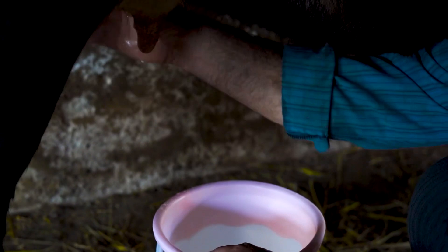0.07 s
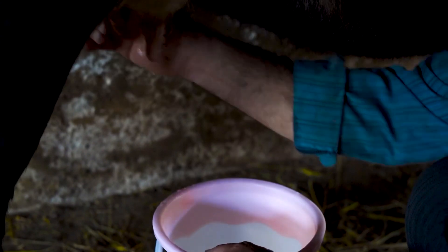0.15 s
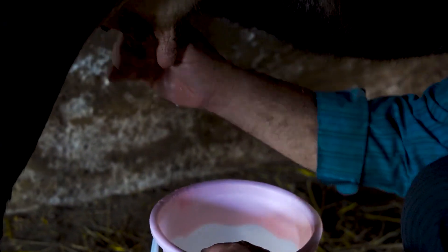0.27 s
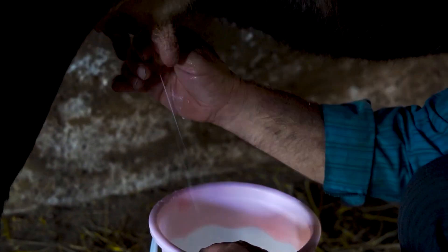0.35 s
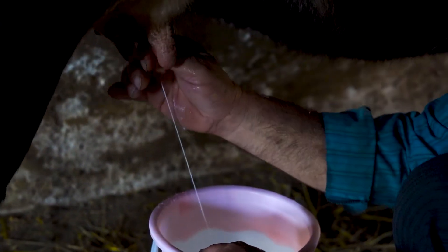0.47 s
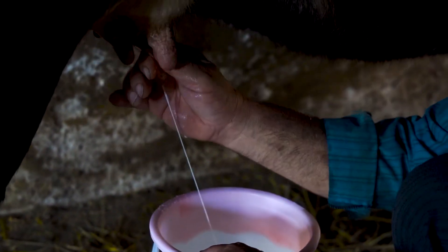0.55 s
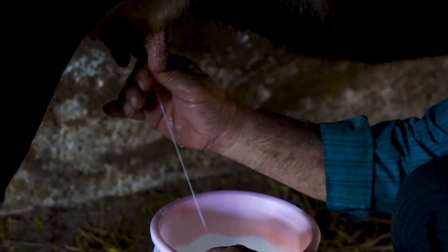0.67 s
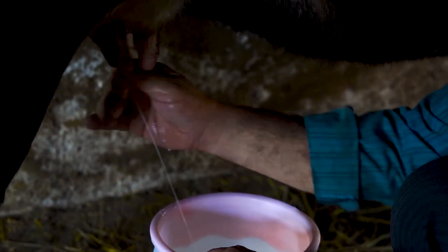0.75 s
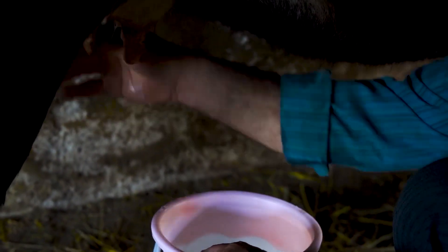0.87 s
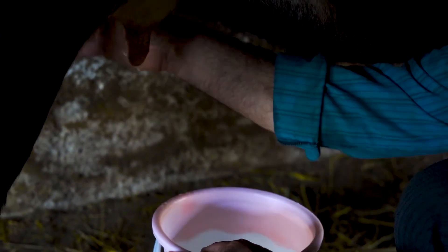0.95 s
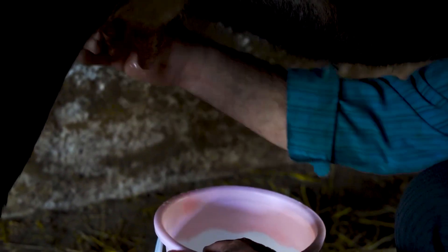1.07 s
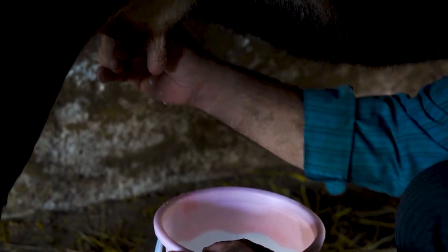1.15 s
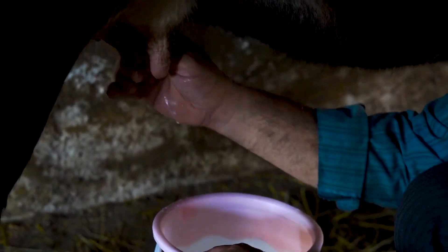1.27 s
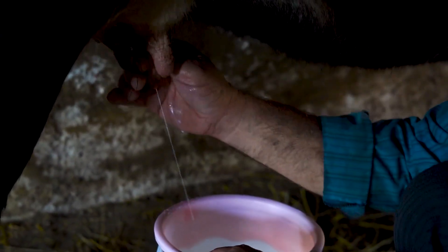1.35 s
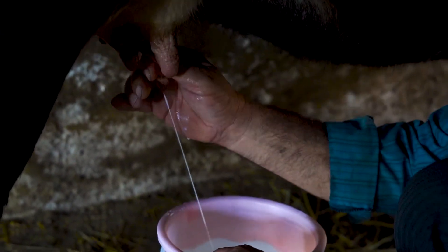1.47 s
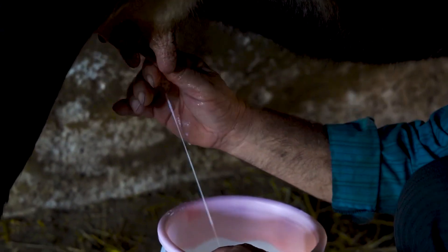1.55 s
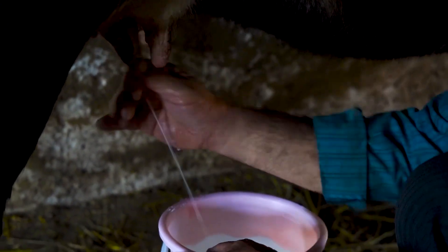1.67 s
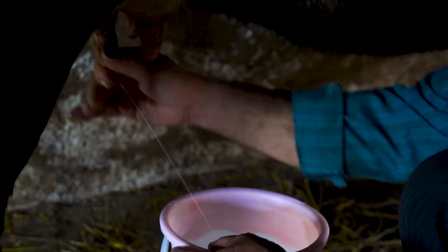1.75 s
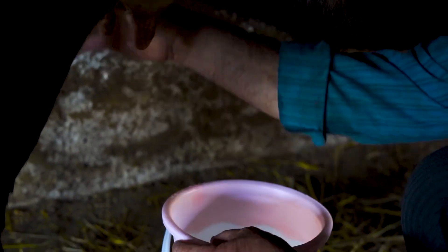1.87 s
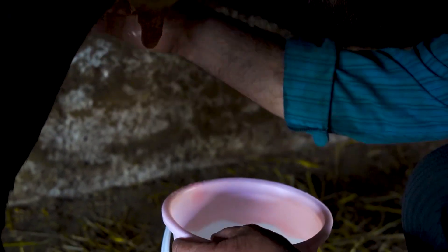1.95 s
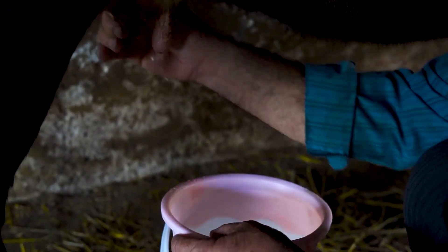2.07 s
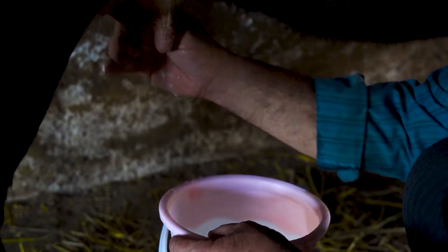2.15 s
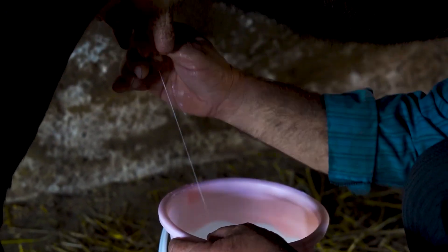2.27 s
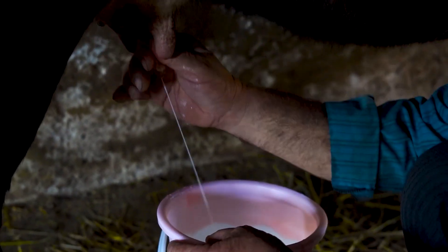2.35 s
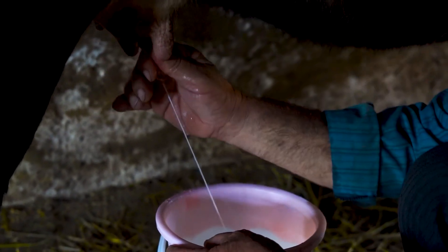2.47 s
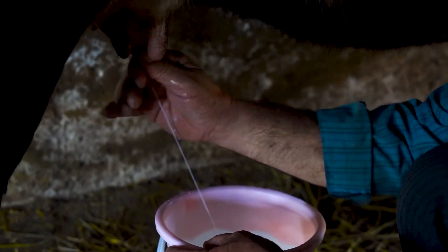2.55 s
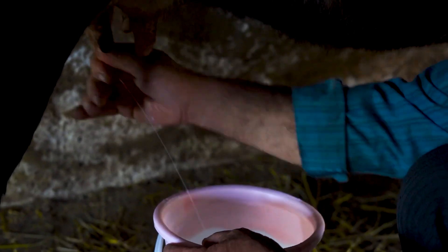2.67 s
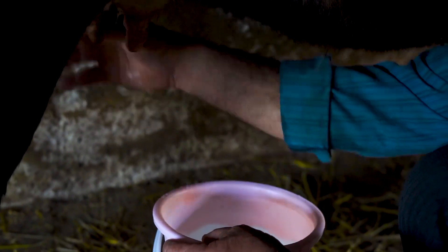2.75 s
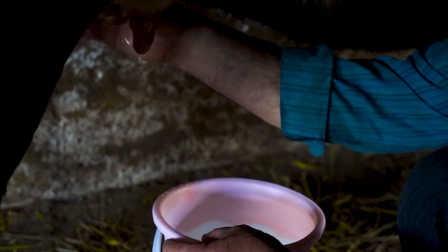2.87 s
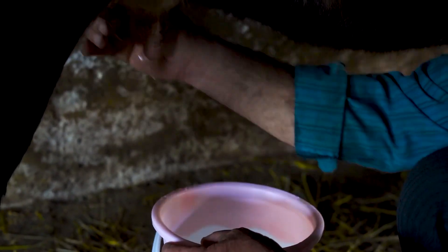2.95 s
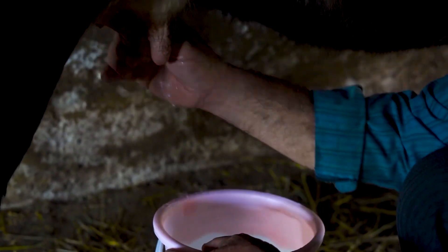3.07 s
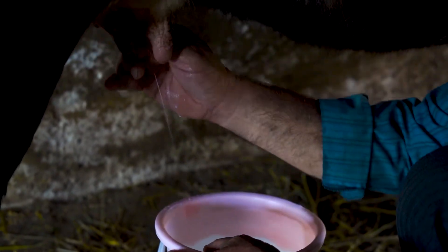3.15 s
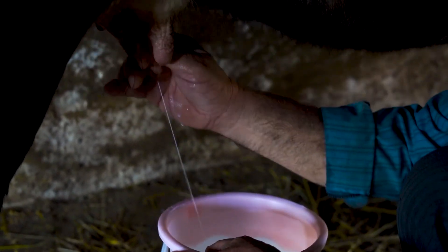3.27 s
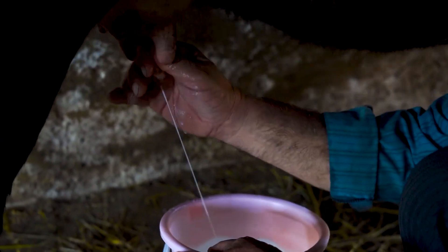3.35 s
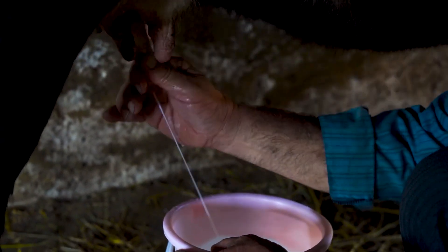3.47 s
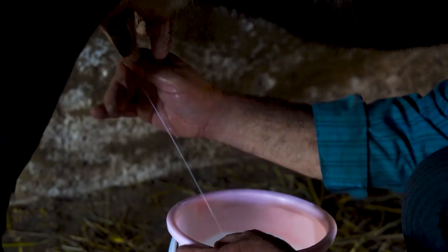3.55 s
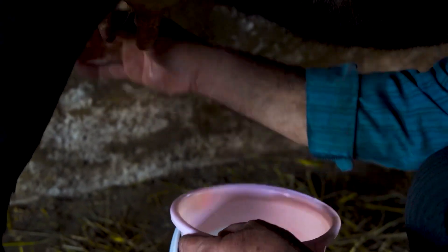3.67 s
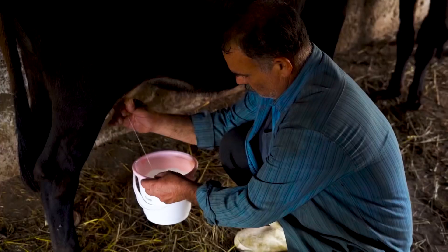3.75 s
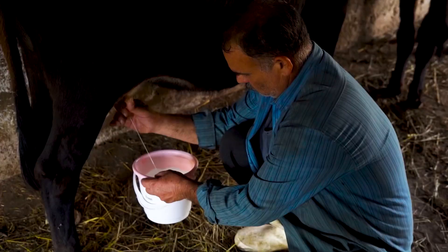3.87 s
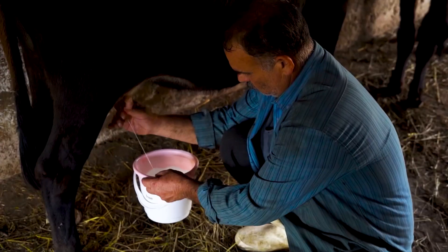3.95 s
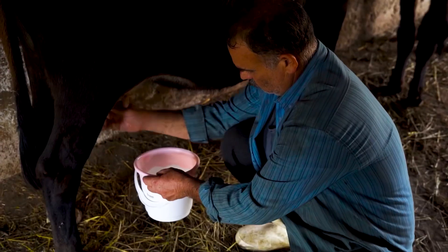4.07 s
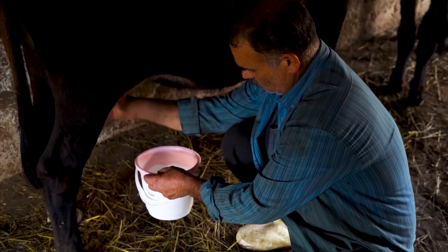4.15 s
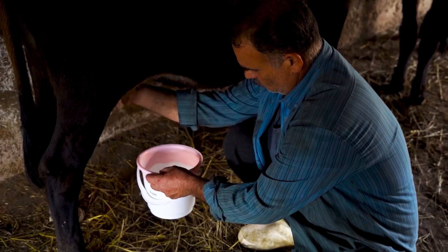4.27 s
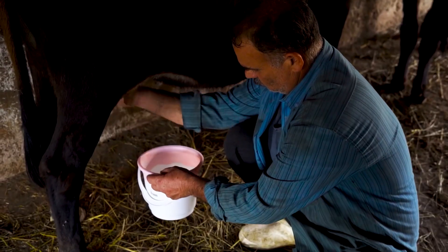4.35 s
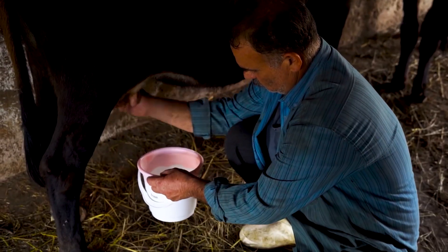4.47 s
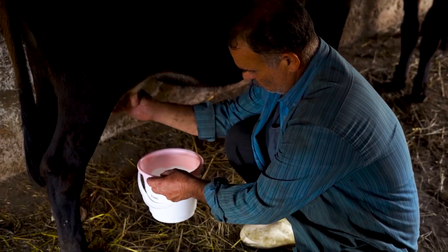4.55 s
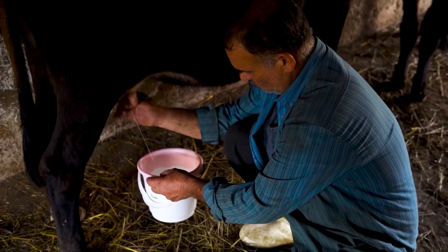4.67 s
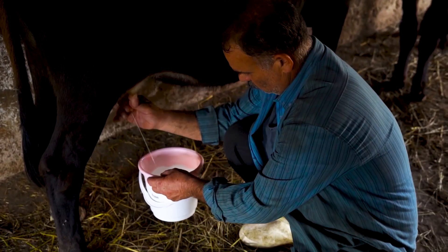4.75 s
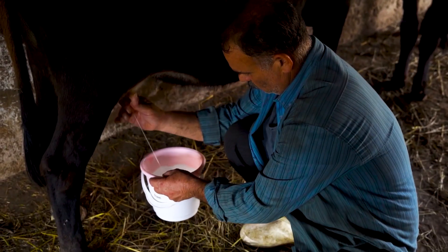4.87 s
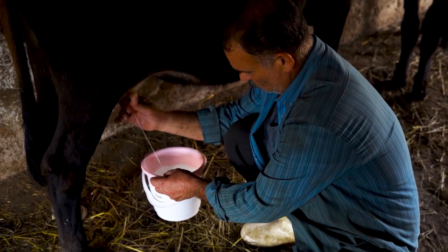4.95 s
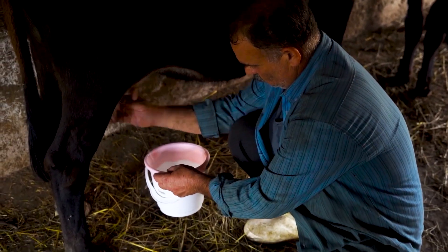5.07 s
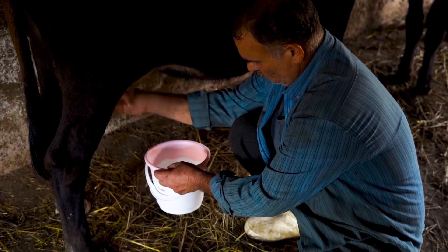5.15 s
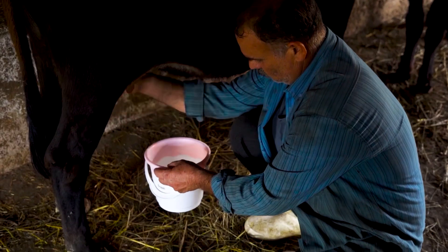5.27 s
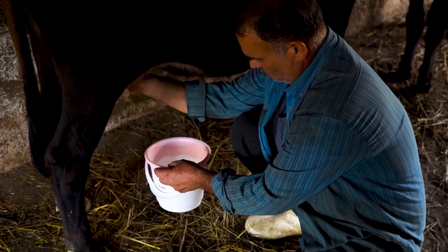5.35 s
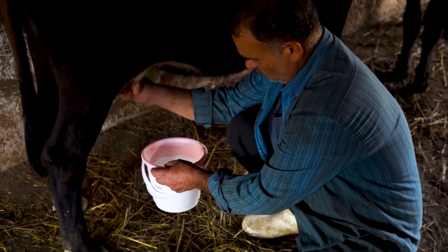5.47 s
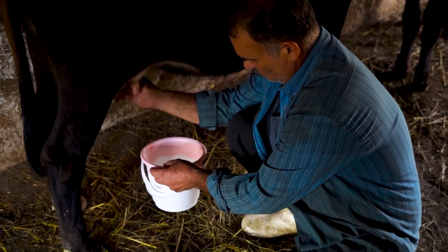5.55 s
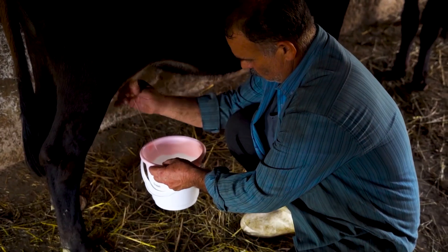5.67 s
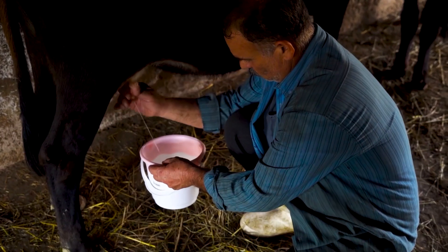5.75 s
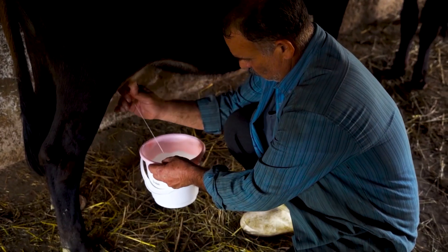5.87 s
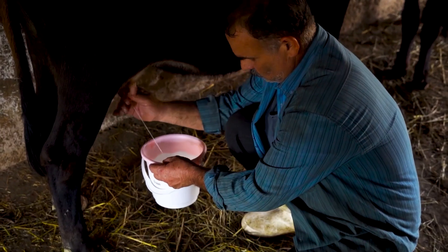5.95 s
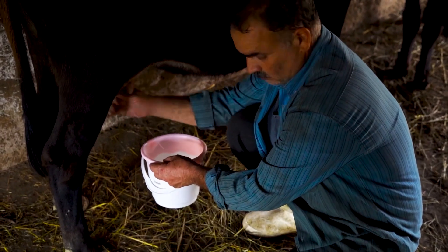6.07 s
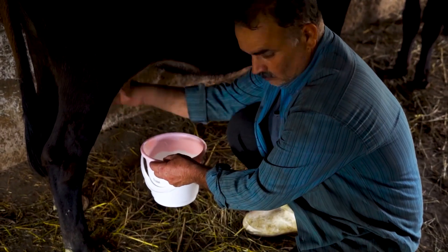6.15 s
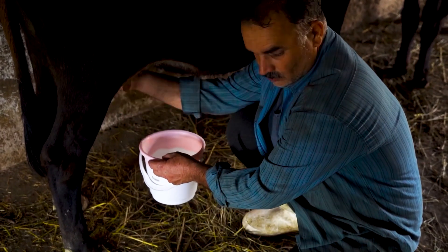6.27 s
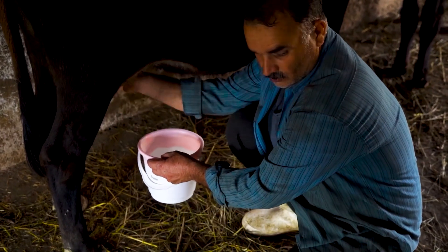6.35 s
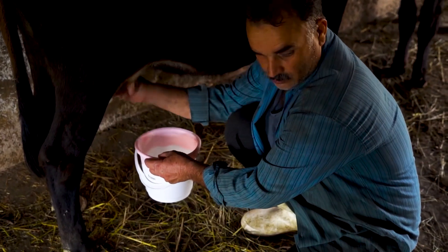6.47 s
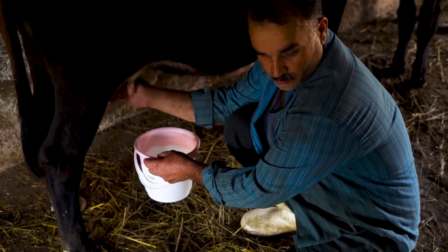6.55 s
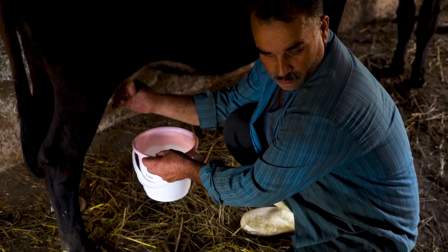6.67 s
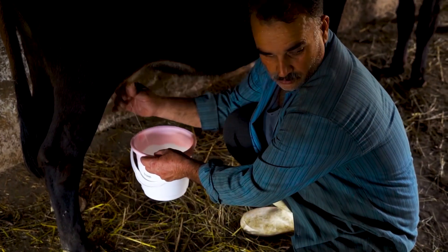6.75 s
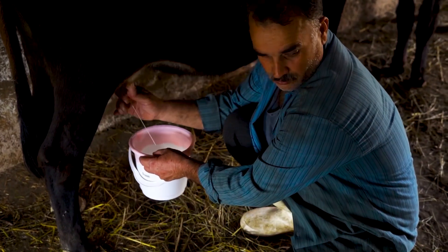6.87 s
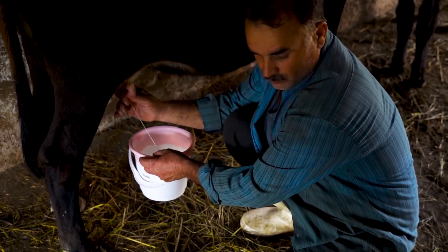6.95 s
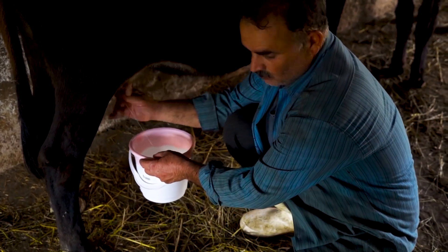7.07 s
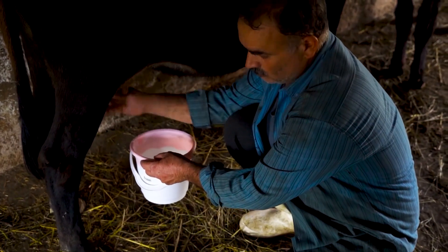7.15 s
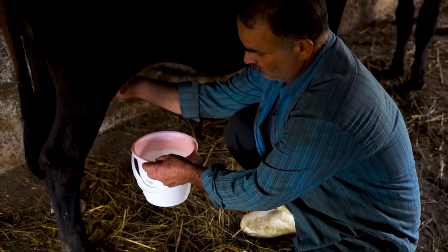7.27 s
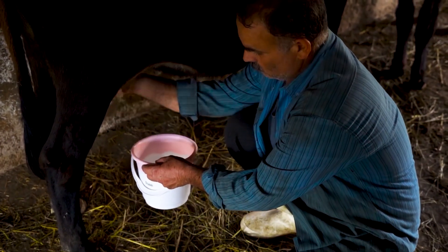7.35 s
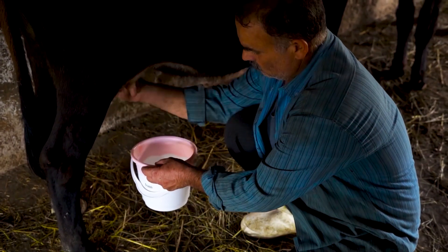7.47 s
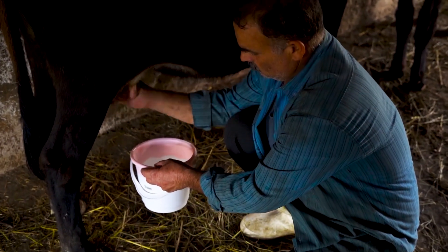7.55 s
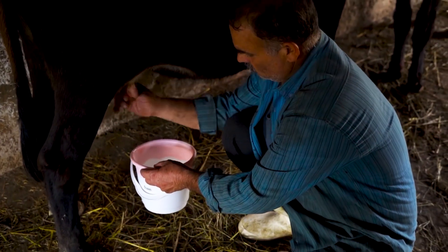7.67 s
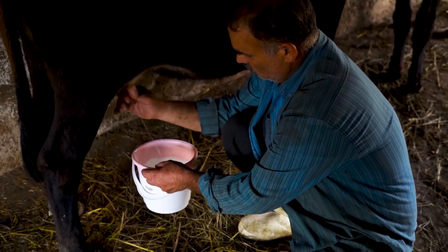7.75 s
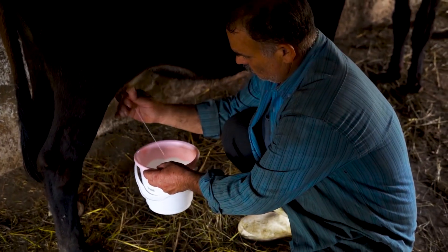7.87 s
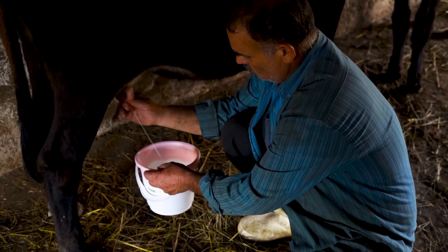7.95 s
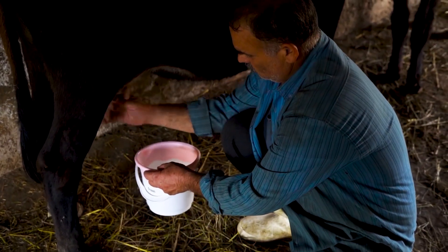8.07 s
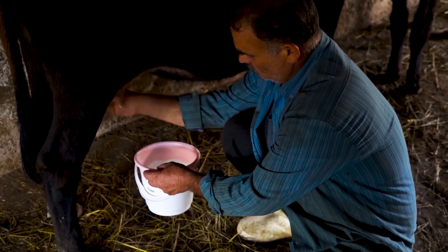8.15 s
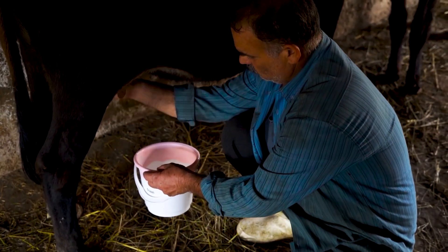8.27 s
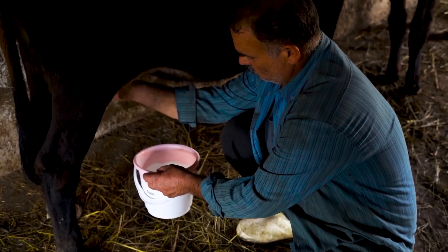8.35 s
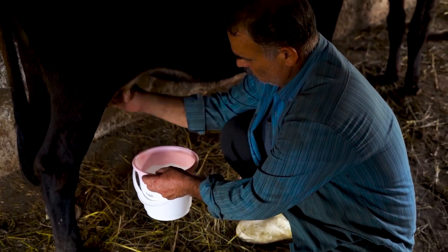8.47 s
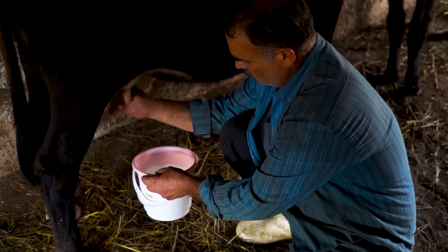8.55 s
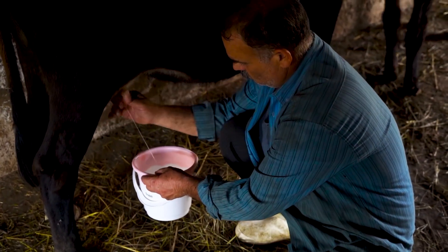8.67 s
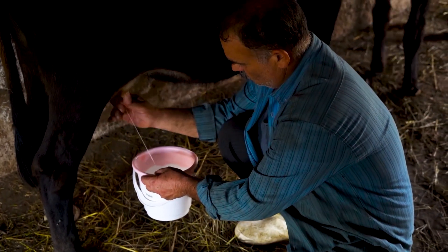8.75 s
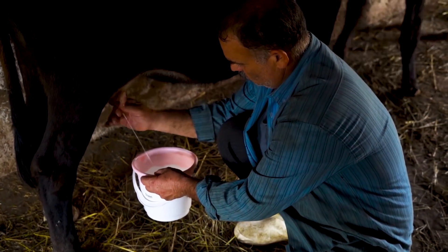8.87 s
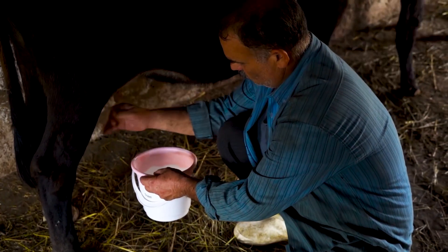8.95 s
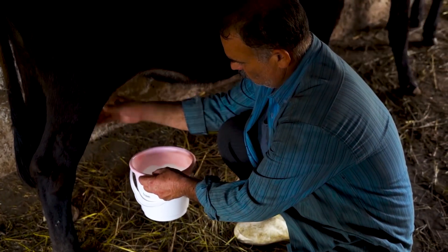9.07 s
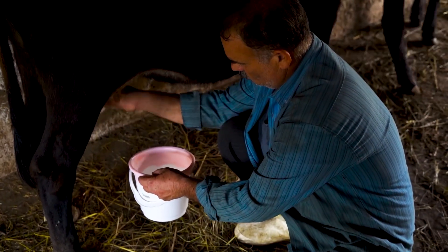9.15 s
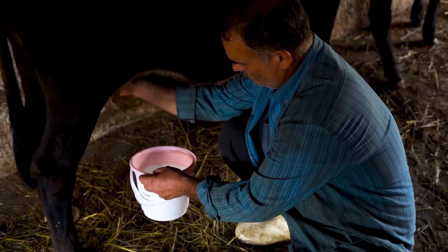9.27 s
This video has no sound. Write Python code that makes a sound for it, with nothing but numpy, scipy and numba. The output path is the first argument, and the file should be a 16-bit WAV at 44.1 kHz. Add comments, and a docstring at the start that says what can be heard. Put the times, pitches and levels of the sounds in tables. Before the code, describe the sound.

A cow is milked by hand in a quiet stable, close to the microphone. About once a second a jet of milk hits a small plastic bucket with a fizzy, bubbling splash and a slightly hollow ring, and tiny drips tick as it fades. A few very faint peeps and two soft, dull bumps on the floor come in between. Toward the end, distant insects and a low murmur of air grow slightly louder.

```python
"""Hand milking in a stable, close to one microphone. From the start, about once a second, a jet of milk
hits a small plastic bucket: its drops drive the modes of the wall and the air inside, beat ringing
bubbles into the froth and throw spray. Drips tick as the squirts fade. From 3 s come faint far peeps
and, at 3.5 s and 9 s, dull bumps on the floor. Toward the end, distant insects and a low murmur of air
grow louder. Everything passes through a comb of narrow notch filters."""
import sys
import numpy as np
from scipy import signal
from scipy.fft import rfft, irfft
from scipy.io import wavfile
from scipy.ndimage import uniform_filter1d
from numba import njit

SR = 44100
rng = np.random.default_rng(int(sys.argv[2]) if len(sys.argv) > 2 else 0)


def generate_wav(signal):
    """Clip the signal to [-1, 1] and save it as 16-bit WAV at the path in sys.argv[1]."""
    frames = np.transpose(np.atleast_2d(signal))
    scaled = np.clip(frames, -1, 1) * 32767
    pcm = np.round(scaled).astype(np.int16)
    wavfile.write(sys.argv[1], SR, pcm)


N = 410571

# Gouts of milk that slap in: start_s, level_db, pitch_hz, t60_s, droplet_db
GOUTS = [(0.4543, -26.5, 2670, 0.068, -30), (0.4706, -12, 2590, 0.065, -19),
         (0.484, -6.5, 2990, 0.072, -24), (0.5526, -2, 2240, 0.19, -14), (0.8789, -29.5, 1950, 0.15, -29),
         (1.44, -24.5, 1370, 0.09, -31), (1.4565, -16, 1340, 0.052, -27), (1.484, -9.5, 1810, 0.12, -16),
         (1.5345, 2.5, 2520, 0.13, -14), (1.7545, -9.5, 1730, 0.09, -35), (1.827, -16.5, 1856, 0.11, -22.5),
         (2.3538, -22.5, 1810, 0.09, -35), (2.379, -9, 2390, 0.13, -20), (2.4708, 1.5, 2580, 0.13, -27),
         (2.637, -8, 2000, 0.1, -19), (2.7263, -14, 2220, 0.09, -24), (2.794, -8, 2650, 0.058, -48),
         (3.272, -28.5, 1860, 0.11, -33), (3.3368, -17, 1850, 0.11, -29), (3.3844, -4.5, 2490, 0.056, -24),
         (3.4077, 0.5, 2640, 0.13, -17), (3.492, -2, 1950, 0.09, -22), (3.5724, 2.5, 1940, 0.13, -30),
         (3.8013, -12.5, 3080, 0.09, -28.5), (3.8347, -6.5, 1930, 0.077, -27),
         (3.8564, -1.5, 2530, 0.13, -20), (4.0637, -12, 1860, 0.09, -36), (4.7316, -30.5, 2670, 0.09, -36),
         (4.776, -24, 1980, 0.083, -31), (4.8074, -15.5, 1520, 0.07, -29), (4.8587, -2.5, 1455, 0.09, -31),
         (4.8925, -6, 1574, 0.11, -28), (5.7503, -39, 3220, 0.071, -43), (5.7801, -10.5, 3280, 0.11, -32),
         (5.882, -4, 2610, 0.13, -22), (6.8397, -26, 1210, 0.09, -48), (6.882, -13, 2190, 0.1, -31),
         (7.0688, -11, 2650, 0.17, -32), (7.8474, -30, 4470, 0.09, -33), (7.886, -7.5, 5320, 0.09, -40),
         (7.9077, -6.5, 4640, 0.084, -36), (7.9892, -20, 2400, 0.083, -24),
         (8.0188, -10.5, 1570, 0.061, -30), (8.042, -18, 2680, 0.09, -23), (8.7217, -24, 2550, 0.081, -30),
         (8.771, -9, 2780, 0.1, -28), (8.8287, 3, 2650, 0.2, -34), (8.9457, 7, 2465, 0.05, -38)]
# Upper and top modes of the bucket: pitch_hz, width_hz, level_db
UPPER_MODES = [(1315, 180, 3), (1441.4, 41, 5.5), (1549, 83, -0.5), (1760, 80, -2), (1879, 55, -4),
               (1974, 51, -1.5), (2210, 80, -4), (2317, 54, -4), (2504, 270, -2.5), (2690, 90, -0.5),
               (2917, 180, -1.5), (3178, 140, -6), (3383, 150, -2.5), (3647, 110, -6), (3840, 120, -8)]
TOP_MODES = [(3910, 300, -1), (4510, 270, -1), (4810, 66, -1), (5080, 100, -4.5), (5396, 220, -6),
             (5970, 210, -6), (6380, 130, -5.5), (6830, 290, -3), (7260, 110, -6), (7800, 410, -0.5),
             (8500, 410, -3), (8700, 1000, -6.5), (9140, 170, -8)]


def milk(t):
    """Forced vibration: one jet drives the froth, the bucket's air and wall, the fizz and the spray."""
    # A curve for each squirt: time_s, froth_db, froth_hz, air_db, treble_db, fizz_hz
    squirts = [
        [(0.0, -19, 2493, -26, -46, 6340), (0.006, -36, 2457, -26.5, -55, 6410),
         (0.016, -50, 2474, -46.5, -54, 6420), (0.1, -86, 2248, -87, -77, 6710)],
        [(0.449, -52, 2510, -31.5, -40, 5523), (0.469, -28.5, 2568, -27.5, -31.5, 5247),
         (0.509, -11.5, 2580, -27.5, -27.5, 7045), (0.535, -21.5, 2310, -24.5, -25, 7200),
         (0.553, -15.5, 2140, -40, -20, 6484), (0.583, -13, 2140, -26.5, -20, 4940),
         (0.631, -13.5, 2497, -32, -20, 6430), (0.653, -13, 2357, -24.5, -19.5, 5420),
         (0.711, -16.5, 2082, -28, -19, 4556), (0.773, -20.5, 2488, -39, -29.5, 4740),
         (0.859, -29.5, 1952, -43, -34.5, 7470), (1.0, -84, 2173, -65, -77, 5910)],
        [(1.435, -60, 1455, -45, -49, 5440), (1.457, -35, 1620, -39, -39, 5062),
         (1.531, -14, 2470, -30, -18.5, 4966), (1.569, -10.5, 2018, -32.5, -24.5, 5746),
         (1.619, -9, 1743, -36, -16.5, 4750), (1.667, -15, 2320, -27.5, -17.5, 5180),
         (1.703, -19.5, 2170, -17.5, -23, 5170), (1.729, -26.5, 1831, -24, -27.5, 4980),
         (1.757, -18.5, 1815, -35.5, -24, 5470), (1.841, -34.5, 1870, -21.5, -35, 6910),
         (1.931, -60, 1740, -55, -62, 6865), (1.97, -83, 1950, -79, -71.5, 7670)],
        [(2.349, -55, 2290, -54, -54, 5570), (2.379, -26.5, 2363, -32.5, -27.5, 5220),
         (2.413, -19, 2120, -32, -27.5, 5430), (2.447, -18.5, 2400, -19.5, -16.5, 5265),
         (2.499, -11.5, 2600, -23, -28.5, 4538), (2.545, -13.5, 1563, -18.5, -22, 6450),
         (2.621, -22.5, 1720, -33, -28.5, 5980), (2.665, -32, 2000, -30, -33.5, 6650),
         (2.741, -36.5, 2060, -33, -35, 5595), (2.803, -48, 2674, -46.5, -59.5, 5630),
         (2.889, -77, 2070, -66, -77, 4690), (2.9, -73.5, 2050, -63, -70.5, 6240)],
        [(3.266, -54.5, 2258, -39, -47.5, 6030), (3.292, -34, 2212, -36.5, -32.5, 5015),
         (3.33, -44.5, 2046, -54, -49.5, 6546), (3.382, -27, 2633, -28.5, -28.5, 5480),
         (3.412, -14, 2570, -38, -23, 5000), (3.478, -22.5, 2614, -28.5, -24.5, 6350),
         (3.5, -12.5, 2356, -33, -24, 5075), (3.53, -7.5, 2180, -30, -18.5, 5920),
         (3.558, -21, 1967, -20, -23, 5480), (3.574, -13.5, 1880, -20.5, -23, 4835),
         (3.678, -37, 1700, -23.5, -41.5, 6940), (3.76, -53, 1880, -46, -60, 4870)],
        [(3.76, -47, 2570, -38, -65.5, 4620), (3.798, -40, 2580, -47, -31.5, 4840),
         (3.866, -10.5, 2430, -28.5, -26.5, 4700), (3.89, -18.5, 2210, -30, -27.5, 5110),
         (3.928, -22.5, 1680, -28.5, -26.5, 6480), (3.978, -25, 1850, -25.5, -29.5, 5237),
         (4.012, -30.5, 1704, -32, -37, 5725), (4.07, -25, 1885, -34, -31, 4910),
         (4.106, -31.5, 2017, -36, -36.5, 6090), (4.172, -41, 1570, -35, -47, 7500),
         (4.224, -49.5, 1900, -54, -43, 6700), (4.3, -76, 1790, -75, -72, 6610)],
        [(4.726, -52.5, 2402, -65, -44.5, 7980), (4.776, -36.5, 2135, -57, -44.5, 4954),
         (4.804, -35.5, 2100, -48, -35, 6916), (4.84, -25.5, 2001, -45, -31, 5883),
         (4.892, -14, 1613, -26.5, -28, 6136), (4.96, -24, 1684, -35.5, -29.5, 5065),
         (4.986, -17.5, 1590, -27.5, -32.5, 5150), (5.056, -35, 2010, -32.5, -40, 6845),
         (5.09, -34, 1885, -41, -39.5, 4920), (5.138, -45.5, 1713, -28, -48, 4950),
         (5.232, -50, 2543, -43, -61, 6150), (5.3, -73, 2038, -73, -75, 6737)],
        [(5.745, -65.5, 2830, -59.5, -51, 5096), (5.785, -28.5, 2763, -45, -38, 4080),
         (5.823, -29.5, 2111, -39, -28, 4800), (5.851, -33, 2430, -36.5, -31, 5383),
         (5.889, -14.5, 2650, -40, -23, 4680), (5.919, -14.5, 2276, -32, -23.5, 5093),
         (5.949, -19, 1940, -38.5, -23.5, 5010), (5.979, -19, 2050, -30, -29, 5270),
         (6.023, -25, 2010, -35, -33, 5715), (6.133, -38, 1800, -43, -37, 6650),
         (6.219, -55.5, 1776, -63, -59, 4976), (6.27, -65, 2090, -77, -70, 6460)],
        [(6.82, -62, 1690, -47, -63, 5420), (6.84, -42, 2290, -38.5, -52, 4810),
         (6.862, -40, 2350, -37, -41, 4510), (6.898, -15.5, 2270, -35.5, -22, 4436),
         (6.936, -15, 2430, -29, -22.5, 5057), (6.956, -14, 2680, -44, -24, 5600),
         (6.992, -24.5, 2493, -48, -25, 5570), (7.038, -26.5, 2500, -54, -27, 5240),
         (7.068, -20, 2520, -45, -21.5, 5080), (7.136, -25.5, 2290, -41.5, -32.5, 4987),
         (7.188, -43.5, 2200, -47, -46, 6710), (7.27, -64.5, 1748, -73, -69.5, 6300)],
        [(7.8, -62, 2112, -72, -54, 5080), (7.832, -49, 2330, -53, -45.5, 4860),
         (7.91, -30, 2490, -50, -26, 4920), (7.946, -27, 2574, -48, -35, 4940),
         (7.972, -31.5, 2510, -55, -42, 6210), (7.986, -32.5, 2360, -48, -29.5, 6500),
         (8.026, -31.5, 1905, -57, -35.5, 5460), (8.056, -29.5, 2607, -28, -32, 5256),
         (8.088, -23.5, 2230, -37.5, -30.5, 6155), (8.126, -35, 2145, -32, -33.5, 5320),
         (8.204, -51, 1595, -44, -52.5, 6696), (8.28, -67.5, 1826, -70.5, -71, 6490)],
        [(8.716, -36, 2680, -58.5, -41, 7540), (8.736, -43, 2582, -31.5, -39.5, 7570),
         (8.786, -22.5, 2645, -57, -34, 5370), (8.818, -31.5, 2670, -27.5, -26, 5180),
         (8.83, -13.5, 2660, -32, -33, 5130), (8.854, -10.5, 2680, -39, -29, 5740),
         (8.918, -22, 2230, -19.5, -24.5, 6560), (8.944, -22, 2406, -28, -29, 7354),
         (8.99, -24.5, 2575, -36, -29, 5040), (9.05, -46, 2000, -35, -50.5, 7250),
         (9.142, -58, 2560, -74.5, -76, 6446), (9.25, -72.5, 2139, -67.5, -58, 6726)],
    ]
    # Timbre of each squirt: air_hz, wall_hz, wall_db, spray_db
    timbres = [(436, 600, -3.5, -9), (431, 900, -7, -8), (447, 700, -6, -9), (443, 900, -8, -11),
               (438.7, 850, -7, -7.5), (434, 950, -1.5, -13), (424.4, 920, -3.5, -7), (424, 1000, -3, -10),
               (468, 940, -4.5, -11.5), (426, 960, -5, -9), (435, 960, -2.5, -8.5)]
    rows = np.concatenate(squirts)
    froth_db, froth_hz, air_db, treble_db, fizz_hz = (np.interp(t, rows[:, 0], c) for c in rows[:, 1:].T)
    current = np.searchsorted([squirt[0][0] for squirt in squirts][1:], t)
    air_hz, wall_hz, wall_db, spray_db = np.array(timbres)[current].T
    air_hz = air_hz * (1 + 0.007 * wander(15))
    air_db, fizz_db = air_db - froth_db, treble_db - froth_db  # relative to the froth
    wall_db = wall_db + 0.41 * air_db  # the wall follows a level between froth and air
    spray_db = spray_db + fizz_db - 0.13 * (treble_db + 22)  # spray fades less than the treble
    spray_db += 1.35 * wander(17)

    flowing = np.any([(t >= squirt[0][0]) & (t <= squirt[-1][0]) for squirt in squirts], axis=0)
    flow = uniform_filter1d(1. * flowing, size=200) * undb(froth_db)
    surge, large_bubbles = gouts()
    jet = flow * sputter() + surge
    patter = drops(scatter_db=1.5)
    foam = froth(patter, froth_hz)
    air = bucket_air(patter, flow + surge, air_hz, air_db)
    wall = bucket_wall(patter, wall_hz, wall_db, froth_db)
    sizzle, mist = fizz(fizz_hz), spray()
    splash = jet * (foam + wall + undb(fizz_db) * sizzle + undb(spray_db) * mist)
    splash += droplets(unit(sizzle + 0.39 * mist), np.where(flowing, treble_db, -99))
    limiter_drive = 1.3  # a soft limiter rounds off the loudest splashes
    limited = np.tanh(limiter_drive * (air + splash + large_bubbles)) / limiter_drive
    return highpass(limited, hz=275, order=8)


def drops(scatter_db):
    """A jet breaks into uneven drops, whose dense impacts add up to noise of flickering level."""
    return unit(rng.standard_normal(N) * undb(scatter_db * wander(700)))


def sputter(spurts_per_s=35):
    """Amplitude modulation: the jet surges at random moments and eases off exponentially."""
    gap, size = rng.standard_exponential((500, 2)).T
    start_s = np.cumsum(gap) / spurts_per_s
    level_db = -10 + 4 * np.minimum(size, 3)
    inside = start_s < N / SR
    return unit(1 + bursts(start_s[inside], level_db[inside], t60_s=0.05))


def gouts():
    """Impulse excitation: each gout makes the jet surge and sets one large bubble ringing."""
    start_s, level_db, pitch_hz, t60_s, _ = np.transpose(GOUTS)
    surge = bursts(start_s, level_db - 25.5, t60_s)
    return surge, rings(start_s, pitch_hz, 0.5 * t60_s, undb(level_db - 8.5), rise=0.039)


def froth(patter, pitch_hz):
    """Resonance of small bubbles and of the bucket's upper modes; such bubbles give no bass."""
    cloud = bubbles(pitch_hz, count=5000, spread=0.2, cycles=61, scatter_db=4)
    bucket = resonate(patter, UPPER_MODES, wander_db=4.2, rate_hz=13, near_hz=pitch_hz, octave_db=4.5)
    return highpass(undb(-5) * cloud + undb(-0.6) * bucket, hz=1150, order=4)


def bubbles(centre_hz, count, spread, cycles, scatter_db):
    """Each bubble is a damped oscillator, a spring of gas in liquid, pitched near a moving centre."""
    onset = rng.random(count) * N
    pitch_hz = centre_hz[onset.astype(int)] * np.exp(spread * rng.standard_normal(count))
    pitch_hz = np.clip(pitch_hz, 600, 12000)
    size = np.minimum(rng.exponential(size=count), 3)
    return unit(rings(onset / SR, pitch_hz, cycles / pitch_hz, undb(scatter_db * size), rise=0.13))


def bucket_air(patter, drive, pitch_hz, level_db):
    """Cavity resonance: the drops ring the air in the bucket at a flickering level."""
    # Modes of the enclosed air: pitch_hz, width_hz, level_db
    air_modes = [(395.5, 52, -3.5), (422.5, 62.4, -0.5), (444.6, 33.4, 2.5), (475, 67, -10),
                 (296, 33, -6.5)]
    gain = drive * undb(level_db + 0.5 * wander(30))
    cavity = resonate(patter, air_modes, wander_db=2.2, rate_hz=20, near_hz=pitch_hz, octave_db=35)
    return undb(1) * bandpass(gain * cavity, hz=390, width_hz=350)


def bucket_wall(patter, pitch_hz, level_db, froth_db):
    """Shell vibration: drops drum on the wall, harder while the jet swells, duller as it fades."""
    # Low modes of the wall: pitch_hz, width_hz, level_db
    wall_modes = [(558, 49, 3), (659, 150, -0.5), (808, 91, -3.5), (903, 68, -3), (959, 60, -3),
                  (1099, 100, 8)]
    swell = np.clip(np.gradient(froth_db) * SR / 500, 0, 1)  # full at 500 dB/s
    centre_hz = pitch_hz * 2 ** ((froth_db + 20) / 60.5)  # an octave per 60.5 dB
    shell = resonate(patter, wall_modes, wander_db=4.4, rate_hz=18, near_hz=centre_hz, octave_db=12)
    return undb(level_db + 1.5 * swell) * shell


def fizz(pitch_hz):
    """Smaller bubbles resonate higher; they sound together with the bucket's top modes."""
    cloud = bubbles(pitch_hz, count=7000, spread=0.22, cycles=110, scatter_db=2.5)
    patter = drops(scatter_db=2.5)
    bucket = resonate(patter, TOP_MODES, wander_db=4.7, rate_hz=22, near_hz=pitch_hz, octave_db=8)
    return undb(-7.5) * cloud + undb(-2.5) * bucket


def spray():
    """Many fine impacts add up to broad bands of high noise."""
    # Bands of spray: pitch_hz, width_hz, level_db
    spray_bands = [(9400, 1300, -1), (10706, 540, -5.5), (12200, 1400, -1.5), (14300, 1300, -3.5),
                   (15800, 2000, -3.5)]
    return resonate(drops(scatter_db=2), spray_bands, wander_db=1.1, rate_hz=35)


def droplets(hiss, treble_db, per_s=60):
    """Impact transients, each a hiss and a tiny ring: one per gout, more at random while milk flows."""
    gout_s, *_, gout_db = np.transpose(GOUTS)
    stray_s = np.cumsum(rng.exponential(size=600)) / per_s
    stray_s = stray_s[stray_s < (N - 1) / SR]
    scatter_db = 3.5 * rng.standard_normal(600)[:len(stray_s)]
    stray_db = treble_db[(stray_s * SR).astype(int)] - 6.5 + scatter_db
    start_s, level_db = np.r_[gout_s, stray_s], np.r_[gout_db, stray_db]
    pitch_hz = np.clip(7000 * np.exp(0.28 * rng.standard_normal(700)[:len(start_s)]), 4000, 14000)
    pings = rings(start_s, pitch_hz, t60_s=0.006, gain=undb(level_db + 0.5))
    return bursts(start_s, level_db + 1, t60_s=0.014) * hiss + pings


def drips():
    """Free decay: each tick rings briefly and shakes the bucket's modes for an instant."""
    # Drips and ticking froth: start_s, level_db, pitch_hz
    ticks = [(0.3644, -50, 4690), (0.3966, -52, 6550), (0.413, -57, 2620), (0.9315, -38, 3080),
             (1.0386, -60, 1520), (1.1097, -53, 3020), (1.1432, -53.5, 2990), (1.8867, -32.5, 6800),
             (1.9365, -41, 8200), (2.852, -39.5, 1830), (3.2184, -55.5, 4600), (3.768, -35, 4700),
             (4.213, -30, 7950), (5.193, -32, 2640), (5.2224, -33.5, 2630), (6.4448, -52.5, 5290),
             (7.808, -45, 4460), (9.1064, -35.5, 2640), (9.162, -44, 2390)]
    start_s, level_db, pitch_hz = np.transpose(ticks)
    pings = rings(start_s, pitch_hz, t60_s=0.014, gain=undb(level_db))
    bucket = resonate(rng.standard_normal(N), UPPER_MODES + TOP_MODES, wander_db=2.1, rate_hz=11)
    return pings + bursts(start_s, level_db - 8, t60_s=0.018) * bucket


def floor_bumps():
    """Soft contact acts as a low-pass filter on a damped ring of sagging pitch."""
    # Bumps on the floor: start_s, level_db, pitch_hz, t60_s
    bumps = [(3.51, -38, 68.7, 0.21), (9.009, -32, 210, 0.091)]
    start_s, level_db, pitch_hz, t60_s = np.transpose(bumps)
    return uniform_filter1d(rings(start_s, pitch_hz, t60_s, undb(level_db), rise=-0.48), size=90)


def peeps(t, pitch_hz=1670):
    """Faint far peeps: a pure tone modulated by short rounded envelopes."""
    calls = [(3.04, 0.069, -67.5), (4.61, 0.1, -70), (7.71, 0.09, -72), (8.62, 0.1, -68.5)]
    envelope = np.zeros(N)
    for start_s, length_s, level_db in calls:
        progress = np.clip((t - start_s) / length_s, 0, 0.999)
        envelope += undb(level_db) * np.sin(np.pi * progress) ** 0.5
    return envelope * np.sin(2 * np.pi * pitch_hz * t)


def stable(t):
    """Filtered noise: broadband for the air's murmur and microphone hiss, narrowband for insects."""
    # Background levels: time_s, air_db, insect_db
    levels = [(0.0, -59, -70), (2.9, -60, -73), (4.46, -57.5, -67), (7.5, -56, -65.5), (9.31, -52.5, -61.5)]
    # Spectral density of murmur and hiss: frequency_hz, level_db
    air_spectrum = [(8.8, -37.5), (15, -2.5), (37, -2), (59, -13), (97, -8), (252, -8.5), (698, -18),
                    (784, -19.5), (1080, -25), (1990, -27.5), (2170, -27), (5050, -28), (6190, -20),
                    (8520, -30), (15700, -26.5)]
    # Three insect choruses: pitch_hz, width_hz, level_db
    choruses = [(5950, 400, -1.5), (6300, 360, -1), (6800, 400, 0)]
    # Pitch favoured among the choruses: time_s, pitch_hz
    insect_pitch = [(0, 6740), (.9, 6600), (1.3, 6280), (4.5, 6520), (9.31, 6435)]
    time_s, air_db, insect_db = np.transpose(levels)
    air = undb(np.interp(t, time_s, air_db)) * coloured_noise(air_spectrum)
    pitch_hz = np.interp(t, *np.transpose(insect_pitch))
    noise = rng.standard_normal(N)
    insects = resonate(noise, choruses, wander_db=1.2, rate_hz=15, near_hz=pitch_hz, octave_db=40.5)
    return air + undb(np.interp(t, time_s, insect_db)) * insects


def resonate(force, modes, wander_db, rate_hz, near_hz=None, octave_db=0):
    """Modal superposition: each mode wanders in level and loses octave_db per octave from near_hz."""
    out, power = 0, 0
    for k, (hz, width_hz, db) in enumerate(modes):
        weight = 1 if near_hz is None else undb(-octave_db * np.abs(np.log2(hz / near_hz)))
        response = bandpass(bandpass(force, hz, 1.4 * width_hz), hz, 1.4 * width_hz)
        out += (-1) ** k * weight * undb(db + wander_db * wander(rate_hz)) * response
        power += width_hz * (weight * undb(db)) ** 2
    return unit(out / np.sqrt(power))


def rings(start_s, pitch_hz, t60_s, gain, rise=0.):
    """Damped oscillations whose pitch changes by the fraction rise over one t60."""
    n60 = np.full(len(start_s), t60_s * SR)
    onset = (start_s * SR).astype(np.int64)
    return damped_sines(N, onset, 2 * np.pi * pitch_hz / SR, 1000 ** (-1 / n60),
                        (1 + rise) ** (1 / n60), gain)


@njit
def damped_sines(n, onset, radians, decay, glide, gain):
    """Exponential decay and glide: amplitude and phase step change by a constant ratio each sample."""
    out = np.zeros(n)
    for k in range(len(onset)):
        phase, step, amplitude, i = 0., radians[k], 1., onset[k]
        while amplitude > 0.003 and i < n:
            out[i] += gain[k] * amplitude * np.sin(phase)
            phase += step
            step *= glide[k]
            amplitude *= decay[k]
            i += 1
    return out


def bursts(start_s, level_db, t60_s):
    """Envelope of sudden onsets with exponential decay."""
    out = np.zeros(N)
    for start, db, length in np.broadcast(start_s, level_db, t60_s):
        tail = out[int(start * SR):int((start + length) * SR)]
        tail += undb(db - 60 * np.arange(len(tail)) / SR / length)
    return out


def coloured_noise(spectrum):
    """White noise shaped by a spectrum of frequency_hz, level_db points."""
    hz, db = np.transpose(spectrum)
    bins_hz = np.maximum(np.fft.rfftfreq(N, 1 / SR), 1)
    gain = undb(np.interp(np.log(bins_hz), np.log(hz), db, left=-90))
    return unit(irfft(rfft(rng.standard_normal(N)) * gain, N))


def wander(rate_hz):
    """Linear ramps between random values, with a spread near 1."""
    hold = int(SR / rate_hz)
    steps = np.repeat(rng.standard_normal(N // hold + 1), hold)
    return 1.275 * uniform_filter1d(steps, hold)[:N]


def bandpass(x, hz, width_hz):
    """Two-pole resonance, gain 1 at the centre."""
    return signal.lfilter(*signal.iirpeak(hz, hz / width_hz, SR), x)


def highpass(x, hz, order):
    """Maximally flat bass cut."""
    return signal.sosfilt(signal.butter(order, hz, "high", fs=SR, output="sos"), x)


def undb(db):
    """Gain of a level in dB."""
    return 10 ** (np.asarray(db) / 20)


def unit(x):
    """Scale to rms 1."""
    return x / np.sqrt(np.mean(x ** 2))


def scene():
    """Superposition: the sources add at one microphone that feeds both channels."""
    t = np.arange(N) / SR
    return np.tile(milk(t) + drips() + floor_bumps() + peeps(t) + stable(t), (2, 1))


def record(dry):
    """Comb filtering: narrow notches on eight multiples of one pitch, then a steep low-pass."""
    spacing_hz, depth, top_hz = 707, 0.69, 15750
    x = dry
    for k in range(1, 9):
        x = x - depth * bandpass(x, k * spacing_hz, width_hz=71)
    return signal.sosfilt(signal.ellip(12, 0.2, 80, top_hz, fs=SR, output="sos"), x)


dry = scene()
out = record(dry)
generate_wav(out)
```